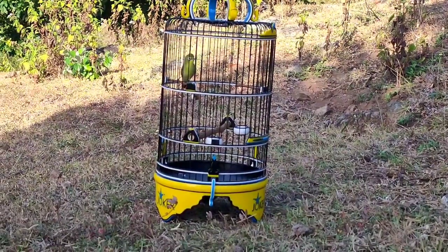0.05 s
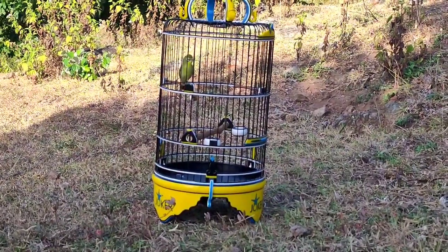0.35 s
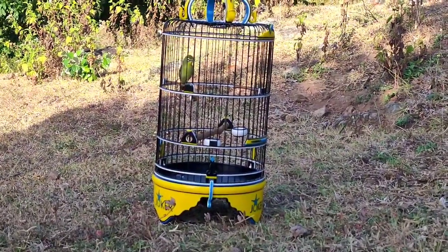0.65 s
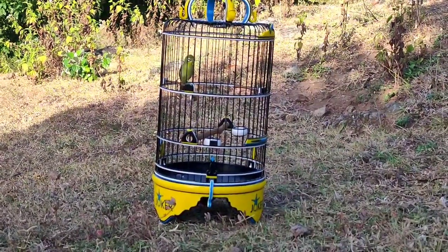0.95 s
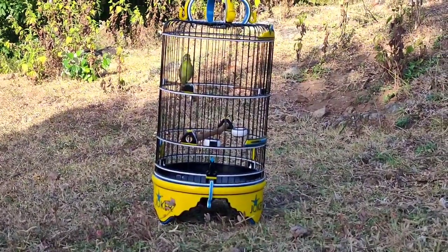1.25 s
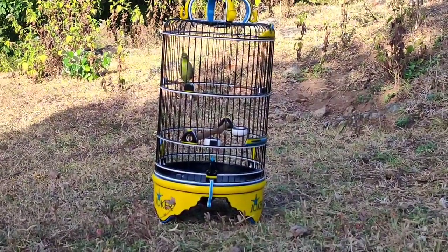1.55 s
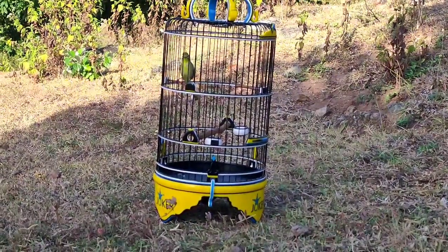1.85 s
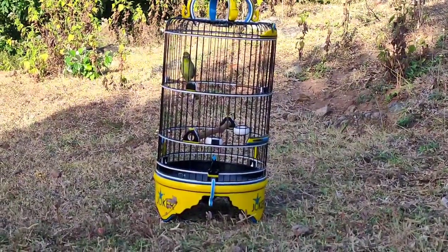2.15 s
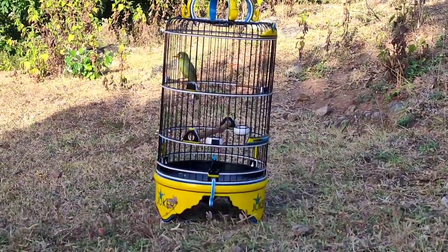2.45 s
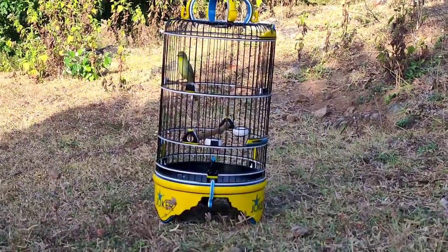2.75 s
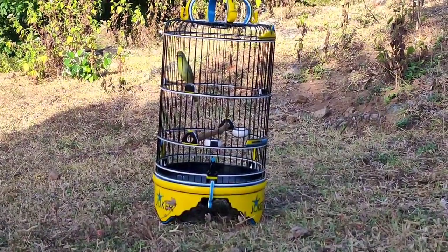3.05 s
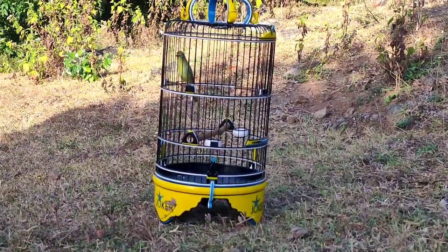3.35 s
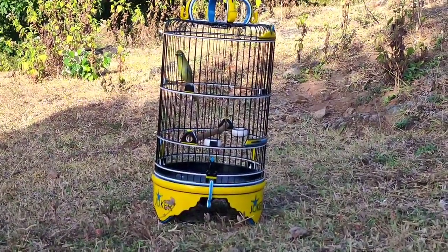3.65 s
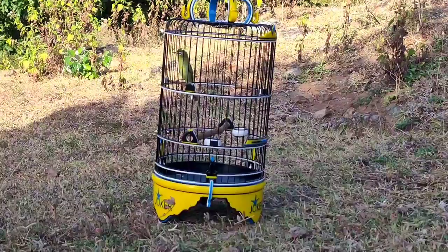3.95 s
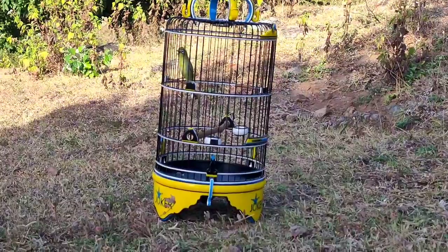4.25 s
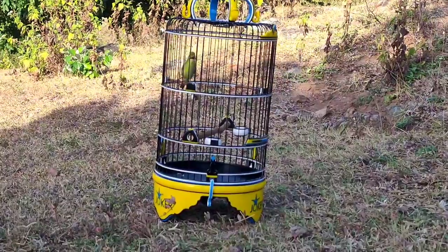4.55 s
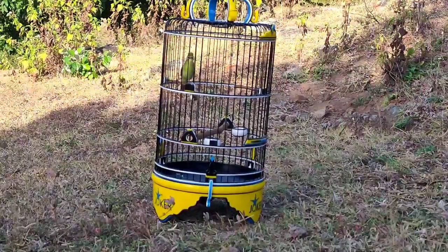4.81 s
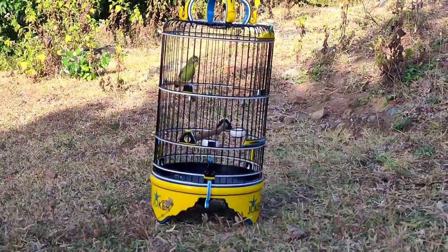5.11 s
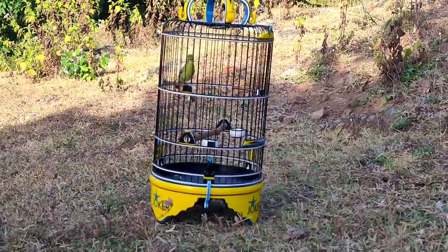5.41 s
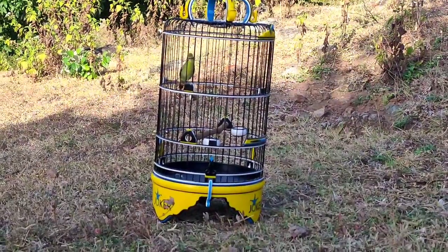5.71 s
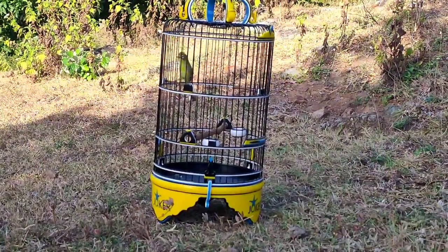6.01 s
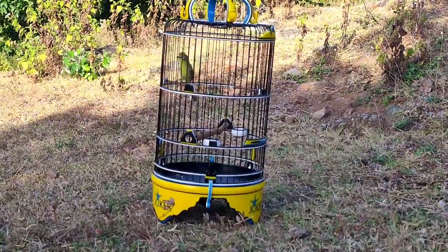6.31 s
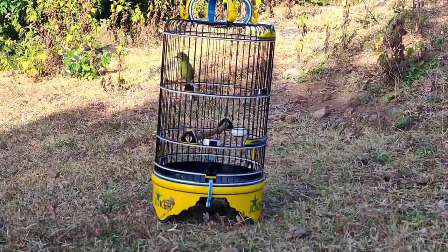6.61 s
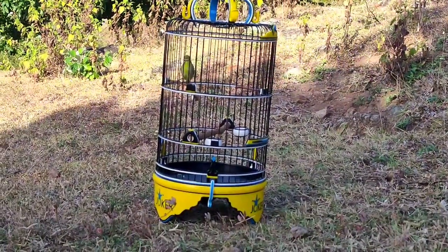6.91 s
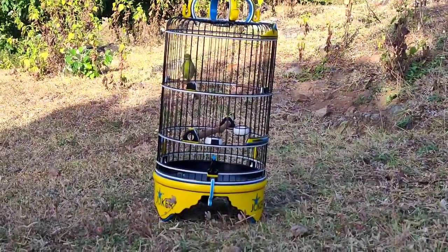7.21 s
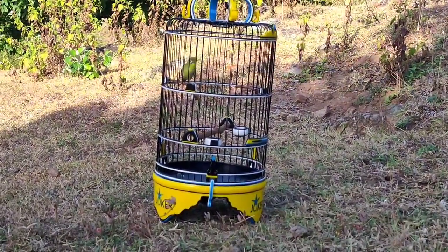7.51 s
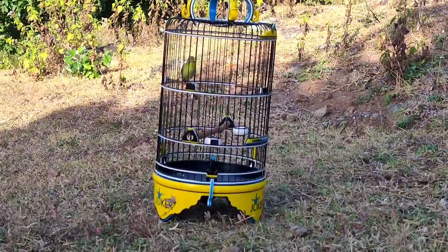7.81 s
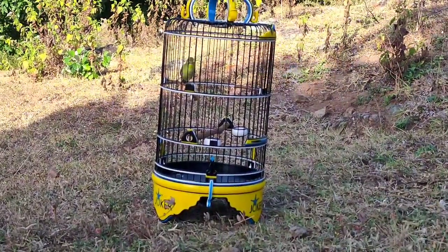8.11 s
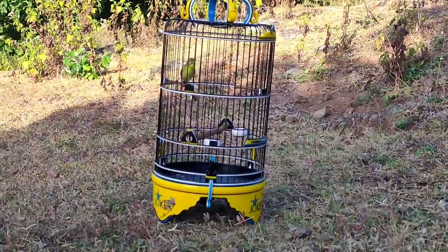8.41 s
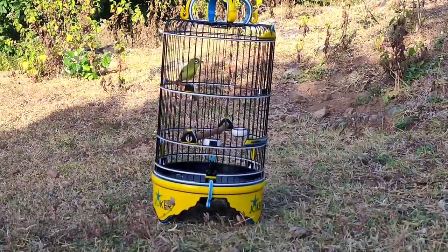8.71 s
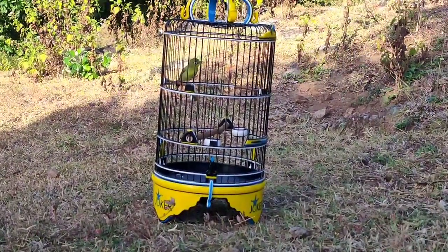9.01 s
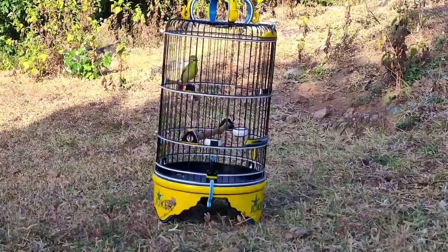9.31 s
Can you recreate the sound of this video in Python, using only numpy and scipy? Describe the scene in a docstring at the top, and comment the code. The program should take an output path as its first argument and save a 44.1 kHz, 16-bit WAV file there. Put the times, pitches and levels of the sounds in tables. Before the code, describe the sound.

The first three seconds are quiet outdoors: an engine idles some way off with a faint, uneven low thumping, and distant birds give soft chips and whistles. At about 3 seconds a small caged bird close to the microphone starts twittering, fast and high, with gliding whistles, quick flicks of pitch and steep chips, mostly in pairs. The song grows louder and runs until about 6.3 seconds, with a very soft hiss swelling behind it. From around 5 seconds wind buffets the microphone with a loud low rumble and short thumps, strongest between 5.2 and 6.2 seconds, then returning in weaker gusts to the end. While the bird pauses, faint far calls continue and the engine fades down. From about 8.7 to 9.6 seconds the bird sings a second short burst, ending on a sharp rising squeak.

```python
"""Caged white-eye on dry grass

Close to a two-port microphone, a white-eye twitters in a wire cage: its syrinx sweeps one tone into
gliding whistles with quick flicks of pitch, and steep chips, mostly in pairs. Some way off an engine
idles with a limping thump; other birds call from afar and a soft hiss swells behind the song.
From halfway on, gusts of wind buffet the ports and single eddies slap them."""
import sys
import numpy as np
from scipy import signal
from scipy.fft import rfft, irfft
from scipy.io import wavfile
from scipy.ndimage import uniform_filter1d

SR = 44100
rng = np.random.default_rng(int(sys.argv[2]) if len(sys.argv) > 2 else 0)


def persist_wave(psi):
    """Save psi, clipped to +-1, as 16-bit WAV."""
    counts = np.round(np.clip(psi, -1, 1) * 32767).astype(np.int16)
    wavfile.write(sys.argv[1], SR, np.atleast_2d(counts).T)


N = 421584
TIME = np.arange(N) / SR
CUTOFF_HZ = 15700   # top of the microphone's range

# colours of the still air, the soft hiss and a treble shimmer: (frequency [Hz], relative density [dB])
AIR_SPECTRUM = [(100, 3.5), (600, 5), (1500, -13), (4500, -13), (7500, -19), (10000, -22), (15000, -21)]
HISS_SPECTRUM = [(550, -14.5), (800, 1.5), (1100, 7), (1450, 4), (2300, 6.5), (2800, -1), (3300, -12.5),
                 (4500, -20), (7000, -7), (10000, -27), (15000, -29)]
SHIMMER_SPECTRUM = [(4500, -34), (6300, 1), (7400, -6.5), (8500, 3), (10000, -10), (15000, -26.5)]
# swell of the soft background hiss and of the shimmer: (time [s], level [dB])
HISS_SWELL = [(0, -91), (.8, -84), (1.65, -81), (1.95, -75.5), (2.8, -73), (3.6, -63.5), (4.2, -60.5),
              (4.8, -62.5), (5.7, -65), (6.2, -73), (6.6, -84)]
SHIMMER_SWELL = [(0, -99), (2.8, -97), (6.5, -87), (7.7, -88), (8.6, -81)]

# distant birds' falling chips: (start [s], relative level [dB])
DISTANT_CHIPS = [(.5, -84), (.64, -79), (.785, -80), (.925, -75), (1.06, -76), (1.205, -75), (1.355, -81)]
# their falling slurs and tiny high chirps:
# (start [s], length [s], first pitch [Hz], last pitch [Hz], relative level [dB])
DISTANT_SLURS = [(6.665, .02, 7700, 6800, -81), (7.07, .02, 8200, 6600, -75), (7.28, .06, 7600, 6800, -84),
                 (7.84, .1, 3800, 2950, -81), (8.3, .11, 3900, 3050, -82)]
# their arched whistles: (start [s], length [s], top pitch [Hz], relative level [dB])
DISTANT_WHISTLES = [(.68, .1, 4600, -87), (.95, .4, 1760, -81), (1.85, .35, 2520, -75),
                    (2.26, .16, 2220, -70), (2.6, .28, 1450, -66), (2.66, .18, 2900, -76),
                    (6.5, .3, 1120, -80), (7.1, .15, 2850, -73), (7.32, .14, 4550, -89),
                    (7.4, .4, 1740, -78), (7.55, .3, 2230, -76), (8.02, .25, 2300, -74)]

# thumps within one engine cycle: (position [share of the cycle], relative level [dB])
CYCLE_THUMPS = [(.08, 0), (.26, -12), (.47, -13), (.67, -10), (.8, -1), (.92, -5)]
# the engine's exhaust and its knock, heard from some way off: (time [s], relative level [dB])
EXHAUST_SWELL = [(0, 2.5), (1.1, -1), (1.75, -5), (2.4, 0), (4.5, -0.5), (6.5, -2.5), (8.2, -9.5)]
KNOCK_SWELL = [(0, -87), (.45, -82), (1.1, -79.5), (1.8, -81), (4.5, -81), (6.5, -100)]

# rumble of any wind on the microphone, and the roar of hard gusts: (frequency [Hz], relative density [dB])
RUMBLE_SPECTRUM = [(10, -33.5), (25, -19.5), (70, -1), (130, -2.5), (210, -7), (300, -15.5), (420, -25.5),
                   (700, -81), (3000, -100)]
ROAR_SPECTRUM = [(50, -25), (130, 2), (220, 1), (370, -2), (540, -8), (700, -19), (1000, -29), (1600, -45),
                 (5000, -88)]
# gusts at the ports: (start [s], hold [s], left force [dB], right force [dB])
PORT_GUSTS = [(0.396, 0.22, -72, -64), (1.16, 0.24, -80, -55), (2.493, 0.39, -66, -73),
              (4.868, 0.28, -47.5, -50.5), (5.121, 0.14, -44, -42.5), (5.155, 0.1, -43.5, -26.5),
              (5.312, 0.051, -27.5, -27), (5.387, 0.061, -37, -28), (5.481, 0.089, -26, -27.5),
              (5.612, 0.021, -31.5, -41), (5.657, 0.066, -28, -31), (5.763, 0.013, -49, -28.5),
              (5.794, 0.082, -26, -25.5), (5.925, 0.081, -28, -26.5), (6.026, 0.13, -32.5, -29.5),
              (6.156, 0.23, -42, -48.5), (6.487, 0.77, -47.5, -46.5), (6.714, 0.087, -38.5, -34),
              (7.098, 0.24, -41, -34), (7.411, 0.26, -46, -38.5), (7.747, 0.38, -61, -49),
              (8.246, 0.25, -64, -39.5), (8.567, 0.45, -52, -50), (8.743, 0.1, -44.5, -57),
              (9.138, 0.24, -55.5, -45.5), (9.4, 0.13, -67, -54.5)]
# single eddies that slap a port: (time [s], strength [dB], left minus right [dB], width [s])
PORT_EDDIES = [(5.157, -24, -15, .0006), (5.259, -19, -18, .0005), (5.339, -17, -2, .0009),
               (5.475, -13, -18, .0009), (5.506, -24, 10, .0005), (5.532, -22, 15, .0004),
               (5.567, -15, -10, .0006), (5.719, -24, -12, .0006), (5.799, -8, -18, .0007),
               (5.819, -14, 12, .0008), (5.847, -14, -3, .0016), (5.866, -19, -6, .0009),
               (5.957, -16, -10, .0009), (6.02, -20, 12, .0012), (6.07, -15, -16, .0014),
               (6.274, -27, 18, .0014), (7.152, -19, 15, .0014), (7.612, -17, -15, .0014),
               (7.84, -29, -18, .002), (8.505, -23, -25, .002), (9.25, -31, 3, .002),
               (9.333, -28, -15, .0016)]

# the white-eye's whistled syllables: (start [s], length [s], first pitch [Hz], last pitch [Hz],
# sag of the glide [octaves], relative level [dB], swell from start to end [dB], fall at both ends [dB])
SONG_SYLLABLES = [(2.935, 0.056, 6420, 4400, 0.18, -45, 9, 9),
                  (2.99, 0.11, 5060, 2500.0, 0.58, -41, 2, -2.5),
                  (3.322, 0.064, 2824, 2880, -0.045, -45, 2.5, 3),
                  (3.363, 0.079, 2365, 2597, -0.22, -38.5, -2, 0),
                  (3.436, 0.067, 2690.0, 2860, 0.083, -43.5, 7.5, -5.5),
                  (3.495, 0.031, 2275, 2450, -0.16, -38, -13.5, 3),
                  (3.589, 0.029, 3700, 2590, 0.24, -45, -18.5, -3.5),
                  (3.603, 0.085, 2204, 3315, -0.26, -30.5, 12.5, 11),
                  (3.747, 0.093, 3740, 2980, 0.11, -30.5, -3, 9),
                  (3.888, 0.017, 5350, 4930, -0.059, -45.5, -2.5, -6),
                  (3.903, 0.15, 4400, 2930, 0.27, -31.5, -7.5, 6.5),
                  (4.092, 0.064, 2400, 2050, -0.033, -39, -1, 5.5),
                  (4.201, 0.178, 7100, 5226, 0.68, -30.5, 2.5, 1.5),
                  (4.541, 0.096, 3410, 3450, 0.094, -27, 11, 8),
                  (4.676, 0.037, 3980, 4310, -0.26, -28.5, 1, 1),
                  (4.744, 0.073, 2840, 2670, -0.086, -29.5, -2.5, 14),
                  (4.839, 0.11, 4180, 2775, 0.16, -29.5, -8.5, 10.5),
                  (5, 0.14, 5056, 3250, 0.28, -28.5, 0.5, 7.5),
                  (5.181, 0.14, 3700, 4930, 0.47, -28.5, 2, 0),
                  (5.395, 0.025, 2610, 2450, -0.097, -41.5, -9, 4),
                  (5.473, 0.13, 3820, 3050, 0.14, -31.5, -2.5, 4.5),
                  (5.641, 0.15, 5604, 2995, 0.4, -29, -1.5, 7),
                  (5.853, 0.073, 3277, 2394, 0.055, -34, 16, 11),
                  (6.029, 0.11, 4490, 2770, 0.15, -32.5, -1.5, 0.5),
                  (6.203, 0.15, 5560, 3153, 0.52, -31, 0, 6),
                  (8.833, 0.11, 3260, 3744, 0.21, -33.5, 3, 7.5),
                  (9.021, 0.063, 2257, 1840, -0.18, -40, -11, 14.5),
                  (9.148, 0.17, 6024, 2820, 0.22, -31, -6, 5.5),
                  (9.499, 0.089, 3130, 2570, 0.24, -45.5, -5, 8),
                  (9.545, 0.019, 4370, 8160, 0.69, -22.5, 22, 13.5)]
# quick flicks of the syrinx that lift the pitch: (time [s], height [octaves], half-width [s])
PITCH_FLICKS = [(2.946, 0.24, 0.012), (2.982, 0.31, 0.014), (3.02, 0.29, 0.022), (3.038, 0.44, 0.019),
                (3.074, 0.65, 0.031), (3.086, 0.28, 0.01), (3.341, 0.17, 0.0084), (3.384, 0.69, 0.015),
                (3.41, 0.35, 0.014), (3.436, 0.35, 0.0096), (3.5, 0.31, 0.0094), (3.625, 0.25, 0.012),
                (3.632, 0.4, 0.01), (3.659, 0.16, 0.0058), (3.795, 0.24, 0.007), (3.906, 0.38, 0.013),
                (3.956, 0.43, 0.021), (4.004, 0.34, 0.017), (4.117, 0.37, 0.0057), (4.247, 0.27, 0.018),
                (4.282, 0.26, 0.017), (4.332, 0.19, 0.0061), (4.352, 0.17, 0.0046), (4.59, 0.35, 0.0055),
                (4.695, 0.093, 0.005), (4.772, 0.3, 0.013), (4.79, 0.4, 0.0042), (4.852, 0.24, 0.0054),
                (4.9, 0.092, 0.0064), (5.018, 0.42, 0.022), (5.069, 0.46, 0.021), (5.108, 0.34, 0.013),
                (5.217, 0.093, 0.013), (5.266, 0.15, 0.014), (5.29, 0.29, 0.028), (5.488, 0.46, 0.02),
                (5.539, 0.2, 0.018), (5.691, 0.14, 0.007), (5.706, 0.28, 0.009), (5.723, 0.21, 0.023),
                (5.753, 0.32, 0.026), (5.784, 0.25, 0.0053), (5.883, 0.28, 0.012), (6.037, 0.34, 0.017),
                (6.093, 0.13, 0.019), (6.246, 0.089, 0.0075), (6.267, 0.43, 0.018), (6.308, 0.41, 0.023),
                (6.323, 0.14, 0.0023), (8.851, 0.12, 0.0069), (8.881, 0.37, 0.0099), (9.037, 0.37, 0.007),
                (9.162, 0.22, 0.01), (9.202, 0.18, 0.017), (9.233, 0.37, 0.025), (9.254, 0.17, 0.0074),
                (9.289, 0.34, 0.024), (9.306, 0.087, 0.0066), (9.529, 0.28, 0.014)]
# the pitch snaps from one shelf to the next: (time [s], step [octaves])
PITCH_JUMPS = [(2.996, -.12), (3.044, -.13), (3.375, .2), (3.498, .15), (3.619, .22), (3.8, -.08),
               (4.273, .08), (4.349, .16), (5.259, .1), (5.716, -.14), (5.729, -.08), (5.766, -.1),
               (6.261, .13), (6.274, -.16), (6.325, -.1), (9.21, -.09), (9.235, -.1), (9.26, -.13),
               (9.308, -.1)]
# the bird presses or eases within a syllable: (time [s], change of level [dB], half-width [s])
SONG_ACCENTS = [(3.408, -2, 0.0037), (3.462, 2.5, 0.03), (4.221, 7.5, 0.011), (4.694, -11.5, .004),
                (8.861, -5, 0.005), (9.169, 4.5, .008), (9.22, -6.5, 0.023)]
# steep falling chips, each entered by a rising hook: (start [s], hook [s], length [s], first pitch [Hz],
# top pitch [Hz], last pitch [Hz], relative level [dB], drop of level at the top [dB])
SONG_CHIPS = [(3.176, .005, 0.046, 5530, 6920, 3150, -39.5, 8),
              (3.222, .006, .036, 3497, 6420, 2850, -36.5, 13),
              (4.429, 0.0091, 0.04, 8014, 8860, 3100, -30, 17),
              (4.46, .012, .047, 3408, 8160, 3050, -30, 18),
              (5.393, .008, .034, 4206, 4800, 2353, -37, 17.5),
              (8.703, 0.0036, 0.036, 6300, 6950, 3550, -48.5, 10),
              (8.74, .01, .041, 3694, 6120, 2975, -39, 7),
              (9.381, 0.01, .04, 5050, 6750, 3330, -29.5, -0.5),
              (9.419, 0.01, 0.039, 3305, 6000, 3160, -28.5, 7)]
# squeaky notes, where the second harmonic takes over: (start [s], end [s], boost [dB])
SQUEAK_SPANS = [(3.319, 3.37, 19), (9.489, 9.547, 36.5)]
# the voice doubles its period, adding partials between the harmonics: (start [s], end [s], amount [dB])
DOUBLING_SPANS = [(2.995, 3.045, -9), (4.26, 4.3, -3), (4.325, 4.35, -8), (5.02, 5.13, -5.5),
                  (5.656, 5.77, -8), (6.215, 6.33, -12.5), (9.18, 9.26, -6.5)]
# harmonics 2 to 5 at the syrinx: (relative level [dB])
HARMONICS_DB = [-5, 1, -4, -6]
# how the beak radiates overtones and rasp: (frequency [Hz], gain [dB])
BEAK_OVERTONE_GAIN = [(4500, -26), (5700, -17), (6600, -11), (7600, -24), (8800, -22), (10500, -32),
                      (13200, -24), (15200, -22)]
BEAK_RASP_GAIN = [(3000, -27), (4500, -39), (5600, -21.5), (6500, -11.5), (7400, -26.5), (8600, -21.5),
                  (10000, -32.5), (11500, -25.5), (13300, -21.5), (14200, -25.5), (15200, -19)]
# how the two ports hear the cage: (frequency [Hz], left minus right [dB], left phase lead [rad])
PORT_RESPONSE = [(2500, 4, 2.5), (3050, 3.5, 1.5), (3400, 10.5, 0.33), (3920, 7, -2), (4400, 2, -1.16),
                 (4800, 11, -1), (4900, 3.5, -2), (6000, 7.5, -2.5), (6500, 18.5, -3), (8500, -2, -2),
                 (13000, 6, -3)]


def from_db(db):
    """Decibels to gain."""
    return 10 ** (np.asarray(db) / 20)


def rms_one(x):
    """Scale to an rms of 1."""
    return x / np.sqrt(np.mean(x ** 2) + 1e-20)


def swell(rows):
    """Gain at each sample from a curve of (time [s], level [dB])."""
    times, levels_db = np.transpose(rows)
    return from_db(np.interp(TIME, times, levels_db))


def in_spans(rows):
    """Gain that is on within each span and zero outside, with soft edges."""
    gain = np.zeros(N)
    for start, end, level_db in rows:
        gain[int(start * SR):int(end * SR)] = from_db(level_db)
    return uniform_filter1d(gain, size=200)


def at_hz(points, hz):
    """Each column of a table, read on a log-frequency axis."""
    knots, *columns = np.transpose(points)
    return [np.interp(np.log(np.maximum(hz, 1)), np.log(knots), column) for column in columns]


def panned(pan_db):
    """Left and right gains of mean power 1."""
    gains = from_db(np.array([pan_db, -pan_db]) / 2)
    return gains / np.sqrt(np.mean(gains ** 2, axis=0))


def drift(rate_hz):
    """Smooth random wander with a spread of 1."""
    pole = np.exp(-40 * np.pi * rate_hz / SR)   # one step every 20 samples
    slow = signal.lfilter([1], [1, -2 * pole, pole * pole], rng.standard_normal(N // 20 + 4002))[4000:]
    return np.interp(np.arange(N) / 20, np.arange(len(slow)), rms_one(slow))


def band(x, low_hz, high_hz):
    """Butterworth band-pass."""
    return signal.sosfilt(signal.butter(2, [low_hz, high_hz], "band", fs=SR, output="sos"), x)


def filtered(x, spectrum):
    """Colour a sound by a table of (frequency [Hz], gain [dB])."""
    gain_db, = at_hz(spectrum, np.arange(N // 2 + 1) * SR / N)
    return irfft(rfft(x) * from_db(gain_db), N)


def coloured(spectrum):
    """Noise with a given spectrum, unrelated at the two ports; rms 1."""
    return rms_one(filtered(rng.standard_normal((2, N)), spectrum))


def scatter(x, delay_s, t60_s):
    """A cloud of small echoes, different at each port."""
    t = TIME[:SR]
    echoes = rng.standard_normal((2, SR)) * from_db(-60 * t / t60_s) * (t > delay_s)
    echoes /= np.sqrt(np.sum(echoes ** 2, axis=1, keepdims=True))
    return signal.fftconvolve(x[None], echoes, axes=1)[:, :N]


def soft_note(pitch, level_db):
    """A whistle on a pitch track that swells and fades."""
    envelope = from_db(level_db) * np.sin(np.linspace(0, np.pi, len(pitch)))
    return envelope * np.sin(2 * np.pi * np.cumsum(pitch) / SR)


def diffuse_noise(spectrum, patchy_db):
    """Noise from all around the microphone, in narrow bands that each flicker; rms 1."""
    edges = np.geomspace(450, 16000, 27)
    white, out = rng.standard_normal((2, 2, N)), 0
    for k, (low, high) in enumerate(zip(edges, edges[1:])):
        level_db, = at_hz(spectrum, np.sqrt(low * high))
        out = out + band(white[k % 2], low, high) * from_db(level_db + patchy_db * drift(4.9))
    return rms_one(out)


def chorus(count=3000, spread_db=3.5, shortest_s=.02, longest_s=.07, blur=.012):
    """Countless faint short calls, smeared by distance into a mottled wash; rms 1."""
    out = np.zeros((2, N + SR))
    smear = 1 + blur * np.resize(drift(90), N + SR)
    for when, span, height, side, strength in rng.random((count, 5)):
        length = shortest_s + (longest_s - shortest_s) * span
        here = slice(int(when * N), int(when * N + length * SR))
        pitch = (900 + 1950 * height ** .7) * smear[here]
        note = soft_note(pitch, spread_db * min(-np.log(1 - strength), 3))
        out[:, here] += np.outer(panned(10 * (side - .5)), note)
    return rms_one(out[:, :N])


def background():
    """Still air, a soft mottled hiss that swells behind the song and sinks again, and a thin shimmer."""
    hiss = from_db(-2.5) * diffuse_noise(HISS_SPECTRUM, patchy_db=4.2) + from_db(-3.5) * chorus()
    shimmer = swell(SHIMMER_SWELL) * diffuse_noise(SHIMMER_SPECTRUM, patchy_db=2)
    return swell(HISS_SWELL) * hiss + shimmer + from_db(-80.5) * coloured(AIR_SPECTRUM)


def far_birds(chip_top_hz=3130, chip_end_hz=2430, chip_s=.033, slur_blur=.036):
    """Falling chips, slurs and arched whistles, blurred by distance."""
    out = np.zeros(N)
    wobble = .003 * drift(60)
    smear = 1 + slur_blur * drift(300)
    for start, level_db in DISTANT_CHIPS:
        note = soft_note(np.linspace(chip_top_hz, chip_end_hz, int(chip_s * SR)), level_db)
        out[int(start * SR):][:len(note)] += note
    for start, length, first_hz, last_hz, level_db in DISTANT_SLURS:
        here = slice(int(start * SR), int((start + length) * SR))
        out[here] += soft_note(np.geomspace(first_hz, last_hz, len(out[here])) * smear[here], level_db)
    for start, length, hz, level_db in DISTANT_WHISTLES:
        here = slice(int(start * SR), int((start + length) * SR))
        arch = .07 * np.linspace(-1, 1, len(out[here])) ** 2
        blur = np.clip(-64 - level_db, 1, 10)   # fainter calls waver more
        out[here] += soft_note(hz * (1 - arch + blur * wobble[here]), level_db)
    return from_db(2) * out + from_db(-1) * scatter(out, delay_s=.005, t60_s=.22)


def engine(cycle_hz=12.9, uneven_db=1.0, puff_s=.009, left_lag_s=.00045):
    """Idling some way off: each cycle sends limping thumps into the exhaust, and a higher knock between."""
    cycles, kicks = np.arange(int(N / SR * cycle_hz)), np.zeros(N)
    for share, thump_db in CYCLE_THUMPS:
        at = ((cycles + share + rng.normal(0, .014, len(cycles))) / cycle_hz * SR).astype(int)
        kicks[np.clip(at, 0, N - 1)] += from_db(thump_db + uneven_db * rng.standard_normal(len(cycles)))
    puffs = signal.lfilter([1], [1, -np.exp(-1 / (puff_s * SR))], kicks) * rng.standard_normal((2, N))
    drive = rms_one(kicks) + from_db(-11) * rms_one(puffs) + from_db(-14) * rng.standard_normal((2, N))
    exhaust = rms_one(band(band(drive, 235, 340), 170, 430))
    stroke = np.cos(np.pi * (TIME * cycle_hz - .5)) ** 4 * from_db(3.5 * drift(8) - 1)
    knock = rms_one(band(band(stroke * rng.standard_normal((2, N)), 700, 880), 650, 1000))
    left, right = from_db(-60) * swell(EXHAUST_SWELL) * exhaust + swell(KNOCK_SWELL) * knock
    return np.array([np.roll(left, int(left_lag_s * SR)), right]) * panned(1.5)[:, None]


def gust_force(breeze_db=-77, rise_db_per_s=800, fall_db_per_hold=46):
    """Each gust rises quickly, holds and dies away; their powers add to the breeze at each port."""
    power = from_db(breeze_db) ** 2
    for start, hold, left_db, right_db in PORT_GUSTS:
        before_db = rise_db_per_s * np.maximum(start - TIME, 0)
        after_db = fall_db_per_hold * np.maximum(TIME - start - hold, 0) / hold
        envelope = from_db(-np.minimum(before_db + after_db, 100))
        power = power + np.outer(from_db([left_db, right_db]), envelope) ** 2
    return np.sqrt(power)


def wind(strong_db=-24, roar_growth=2.09):
    """Each port has its own turbulence; the harder it blows, the more rumble yields to bursts of roar."""
    force = gust_force()
    hardness = np.minimum(force / from_db(strong_db), 1) ** roar_growth
    lumps = rms_one(from_db(4.5 * np.tanh([drift(38), drift(38)])))
    bursts = rms_one(from_db(4 * np.minimum([drift(45), drift(45)], 1.5)))
    rumble = coloured(RUMBLE_SPECTRUM) / (1 + hardness)
    roar = from_db(-2.5) * hardness * bursts * coloured(ROAR_SPECTRUM)
    return from_db(3.52) * force * lumps * (rumble + roar)


def eddies(crackle_s=.003, tight_s=.0007):
    """An eddy sucks at a port and the pressure swings back; tight ones crackle apart, wide ones thud."""
    out, t = np.zeros((2, N)), TIME[:SR // 20] - .005
    for when, strength_db, pan_db, width in PORT_EDDIES:
        slap = -np.exp(-(t / width) ** 2) + np.exp(-((t / width - 2.5) / 2) ** 2) / 2
        crackle = rms_one(band(band(rng.standard_normal(len(t)), 280, 560), 200, 700))
        crackle *= np.exp(-(t / crackle_s - .5) ** 2)
        crackle *= from_db(-13.5) * min(tight_s / width, 1) ** 1.5
        sides = panned(pan_db)
        gains = from_db(strength_db) * sides / sides.max()
        out[:, int((when - .004) * SR):][:, :len(t)] += np.outer(gains, slap + crackle)
    return band(out, 50, 1100)


def cage_to_microphone(song):
    """The direct song at the ports, quick echoes off cage and ground, a tail off the bank and leaves."""
    pan_db, lead = at_hz(PORT_RESPONSE, np.arange(N // 2 + 1) * SR / N)
    direct = irfft(rfft(song) * panned(pan_db) * np.exp(.5j * np.array([lead, -lead])), N)
    # thin bars scatter the treble most
    wires = from_db(-11) * scatter(band(song, 7500, 22000), delay_s=.000077, t60_s=.033)
    ground = from_db(-20) * scatter(band(song, 4300, 15000), delay_s=.0027, t60_s=.055)
    bank = from_db(-29.5) * scatter(song, delay_s=.02, t60_s=.36)
    leaves = from_db(-17) * scatter(band(band(song, 6300, 11000), 6000, 12000), delay_s=.015, t60_s=.7)
    gate = TIME > SONG_SYLLABLES[0][0] / 2   # opens well ahead of the first note
    return (direct + wires + ground + bank + leaves) * gate


def syllable(start, length, first_hz, last_hz, sag, level_db, swell_db, ends_db,
             attack_s=.0098, release_s=.0079, snap_s=.0006, shelf_s=.007, scoop_s=.004):
    """A sagging glide of the syrinx with flicks and jumps. Gives its slice, pitch and loudness."""
    here = slice(int(start * SR), min(int((start + length) * SR), N))
    t = TIME[here]
    progress = (t - start) / length
    bowl = (2 * progress - 1) ** 2   # 1 at the ends, 0 in the middle
    octaves = progress * np.log2(last_hz / first_hz) - sag * (1 - bowl)
    for when, height, width in PITCH_FLICKS:
        if start < when < start + length:
            octaves += height * np.exp(-np.abs((t - when) / width) ** 1.5)   # between a cusp and a bell
    dip_db = np.clip(.05 * np.gradient(octaves) * SR, 0, 11.5)   # the voice thins while the pitch climbs
    for when, step in PITCH_JUMPS:
        octaves += step / 2 * np.tanh((t - when) / snap_s) * np.exp(-np.abs(t - when) / shelf_s)
    octaves -= .3 * np.exp((start - t) / scoop_s)   # scoops up into the note
    octaves -= .12 * np.exp((t - start - length) / scoop_s)   # droops as it closes
    accent_db = sum(db * np.exp(-((t - when) / width) ** 2) for when, db, width in SONG_ACCENTS)
    contour_db = accent_db + swell_db * (progress - .5) - ends_db * bowl - dip_db
    gate = np.clip(np.minimum((t - start) / attack_s, (start + length - t) / release_s), 0, 1)
    return here, first_hz * 2 ** octaves, gate * from_db(level_db + contour_db)


def chip(start, hook, length, first_hz, top_hz, last_hz, level_db, top_drop_db,
         sag_octaves=.065, fade_db=12, edge_s=.003):
    """A thin hook up to the top, then a steep fall, loud halfway. Gives its slice, pitch and loudness."""
    here = slice(int(start * SR), int((start + length) * SR))
    t = TIME[here] - start
    rise = np.clip(t / hook, 0, 1)
    fall = np.clip((t - hook) / (length - hook), 0, 1)
    octaves = np.log2(first_hz / top_hz) * np.cos(np.pi * rise / 2) ** 2
    octaves += np.log2(last_hz / top_hz) * fall - sag_octaves * np.sin(np.pi * fall) ** 2
    gate = np.clip(np.minimum(t, length - t) / edge_s, 0, 1)
    drop_db = np.where(fall < .5, top_drop_db, fade_db) * (2 * fall - 1) ** 2
    return here, top_hz * 2 ** octaves, gate * from_db(level_db - drop_db)


def song_line():
    """Pitch and loudness of all syllables and chips; where two notes meet, the louder has the voice."""
    pitch, loudness = np.zeros((2, N))
    notes = [syllable(*row) for row in SONG_SYLLABLES] + [chip(*row) for row in SONG_CHIPS]
    for here, hz, gain in notes:
        pitch[here] = np.where(gain > loudness[here], hz, pitch[here])
        loudness[here] = np.maximum(gain, loudness[here])
    return pitch, loudness


def syrinx_overtones(pitch, phase, strain):
    """Ragged harmonics that grow with strain; period doubling puts partials between them."""
    squeak, doubling = in_spans(SQUEAK_SPANS), in_spans(DOUBLING_SPANS)
    ragged = phase + .16 * drift(500) / (1 + squeak)
    out = doubling * (np.sin(ragged / 2) + np.sin(3 * ragged / 2) + np.sin(5 * ragged / 2) / 2)
    for k, harmonic_db in enumerate(HARMONICS_DB, 2):
        glint_db = 9 * np.tanh(drift(30) - .4) / (1 + squeak)
        in_range = np.clip((CUTOFF_HZ - k * pitch) / 300, 0, 1)
        gain = from_db(harmonic_db + glint_db) * (1 + squeak * (k == 2)) / (1 + doubling)
        out += np.sin(k * ragged) * gain * np.minimum(strain, 1.1) ** 2.5 * in_range
    return out


def white_eye(jitter=.01, waver_db=2.15, flutter=.046, break_hz=6750, break_range_hz=600):
    """The syrinx sweeps one tone; high notes flutter, break and send overtones and rasp out the beak."""
    pitch, loudness = song_line()
    pitch *= 1 + jitter * drift(130)
    strain = pitch / 4000
    loudness *= from_db(waver_db * drift(110)) * (1 + flutter * strain ** 2 * drift(800))
    phase = 2 * np.pi * np.cumsum(pitch) / SR
    broken = np.clip((pitch - break_hz) / break_range_hz, 0, 1)
    tone = np.sin(phase) + from_db(-1) * broken * np.sin(phase / 2)   # a break adds the octave below
    overtones = filtered(loudness * syrinx_overtones(pitch, phase, strain), BEAK_OVERTONE_GAIN)
    flicker = from_db(4 * (np.tanh(drift(44)) + np.tanh(drift(160))) - 3)
    rasp = .24 * np.minimum(strain, 1.2) ** 3 * flicker * rng.standard_normal(N)
    return np.sqrt(2) * (loudness * tone + overtones + filtered(loudness * rasp, BEAK_RASP_GAIN))


def scene():
    """The bird close by, its surroundings, and the wind on the microphone itself."""
    return cage_to_microphone(white_eye()) + far_birds() + engine() + background() + wind() + eddies()


def record(dry):
    """The microphone's range ends in a steep treble cut."""
    return signal.sosfilt(signal.ellip(10, .2, 80, CUTOFF_HZ, fs=SR, output="sos"), dry)


dry = scene()
out = record(dry)
persist_wave(out)
```